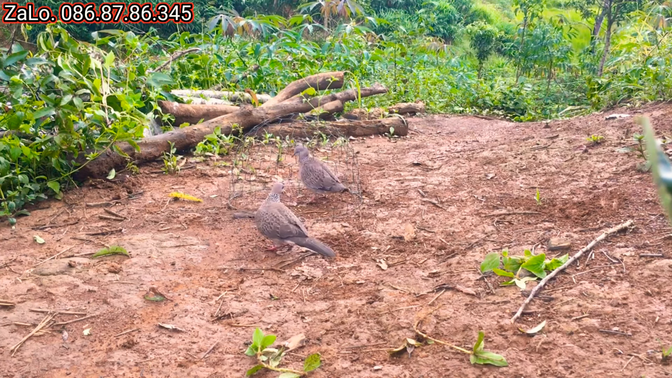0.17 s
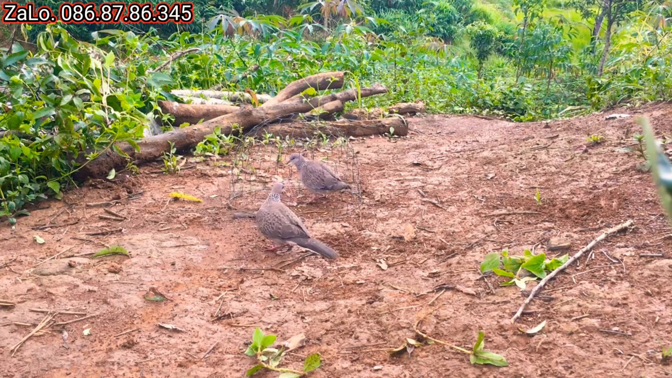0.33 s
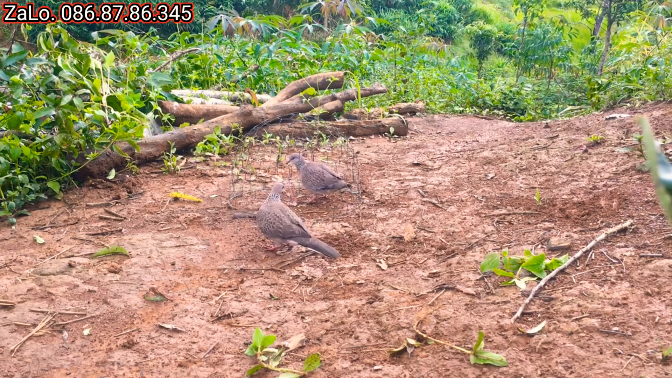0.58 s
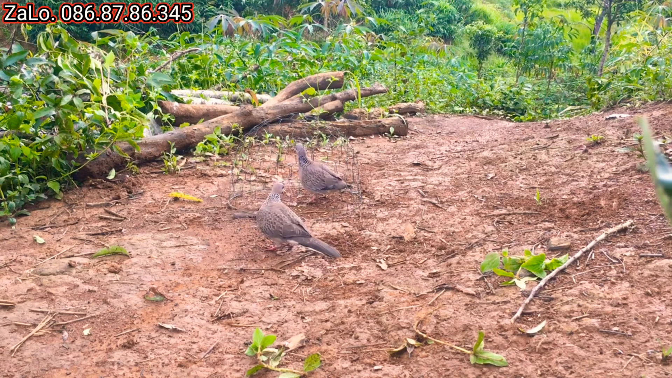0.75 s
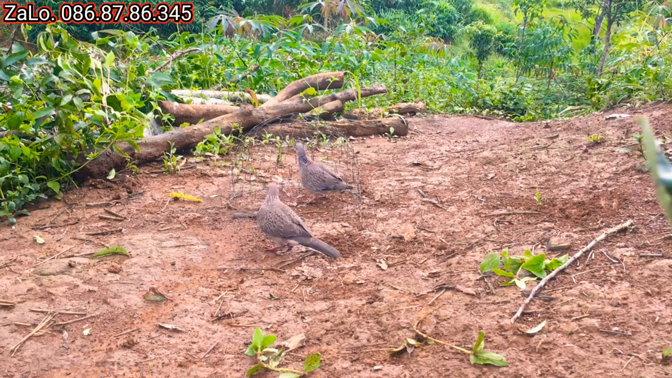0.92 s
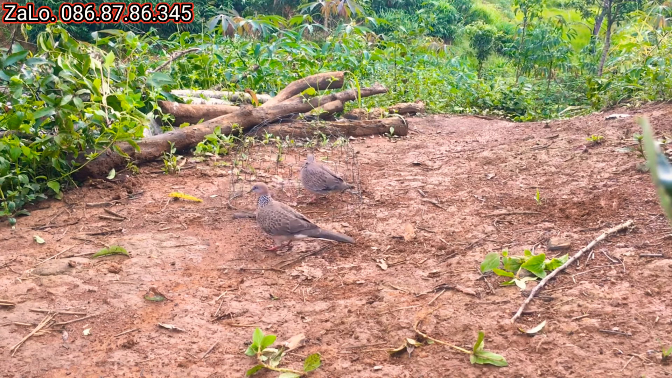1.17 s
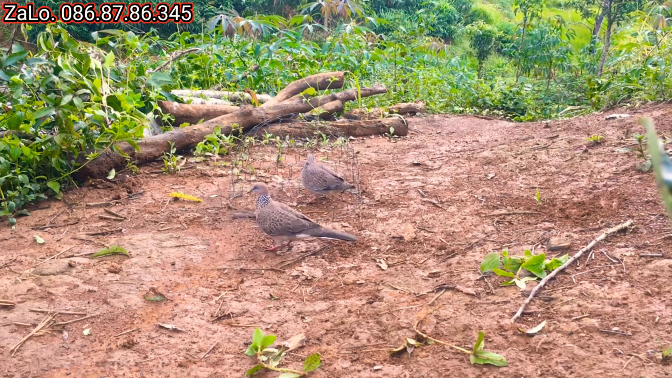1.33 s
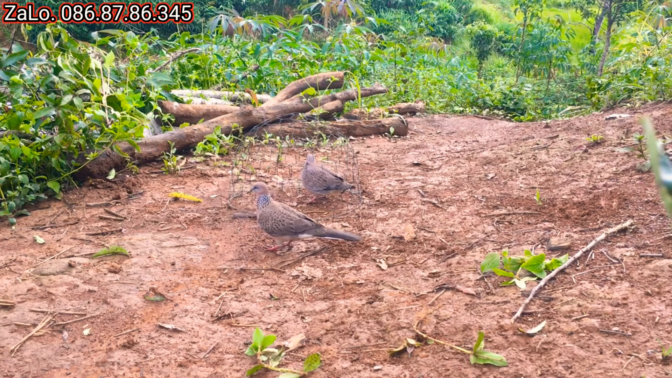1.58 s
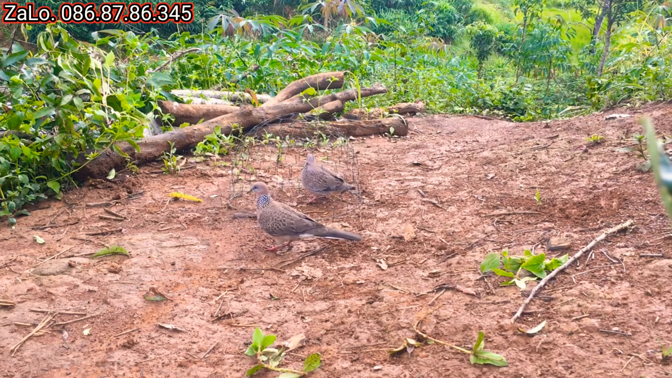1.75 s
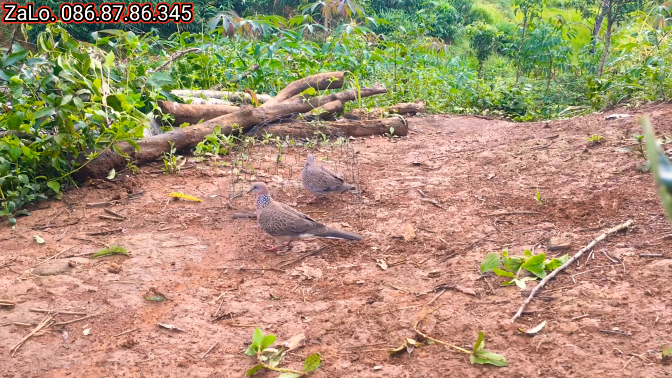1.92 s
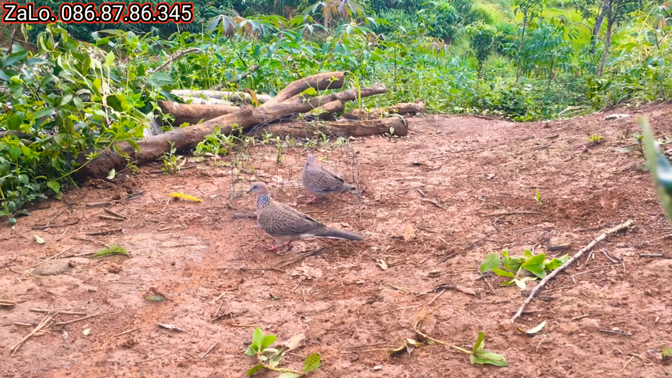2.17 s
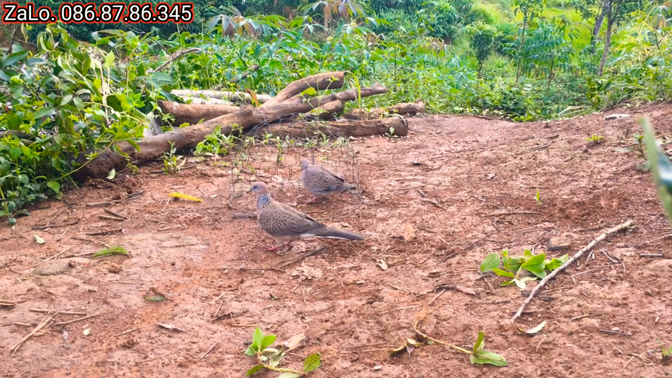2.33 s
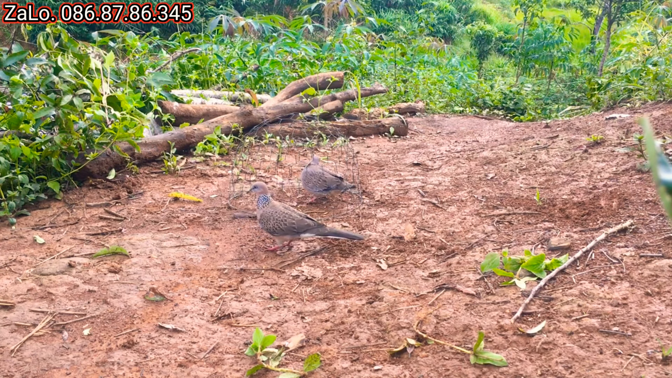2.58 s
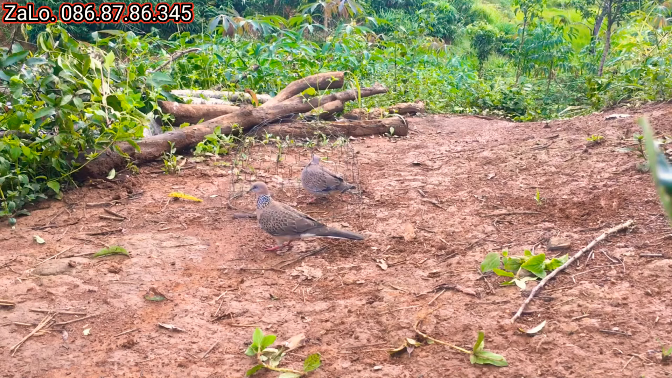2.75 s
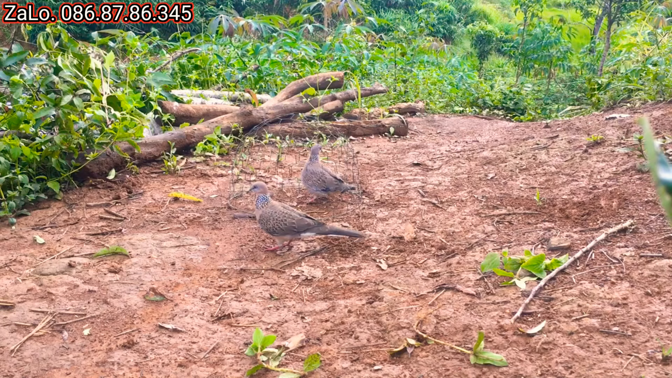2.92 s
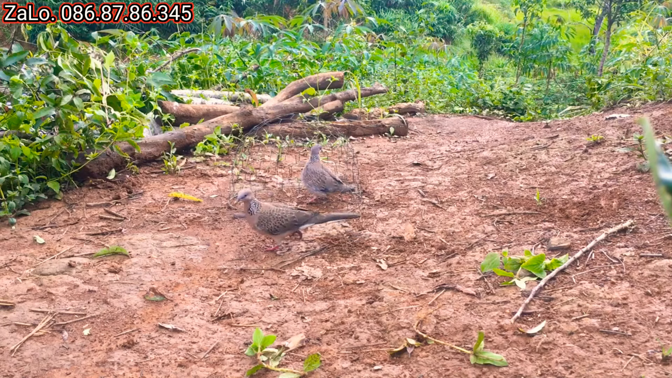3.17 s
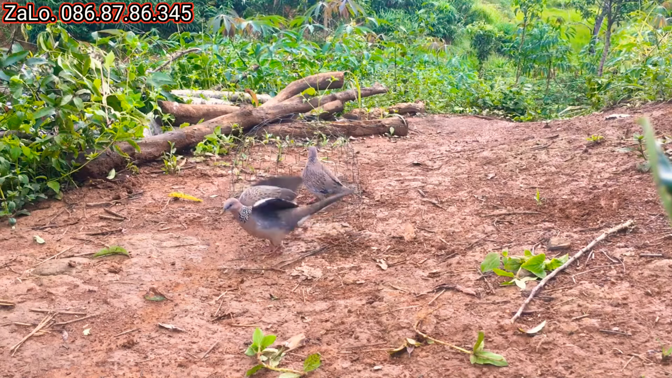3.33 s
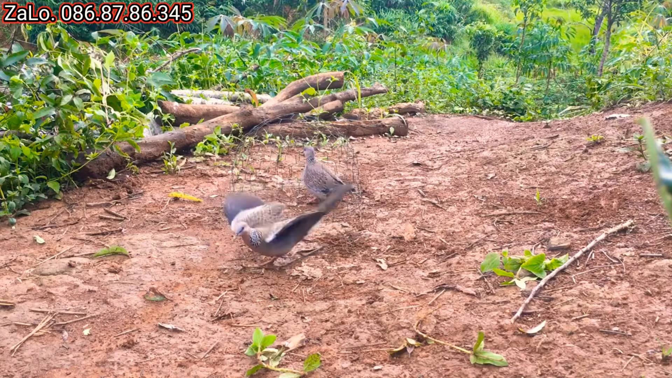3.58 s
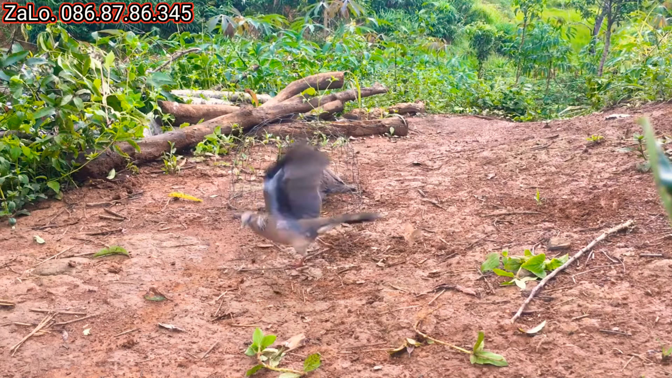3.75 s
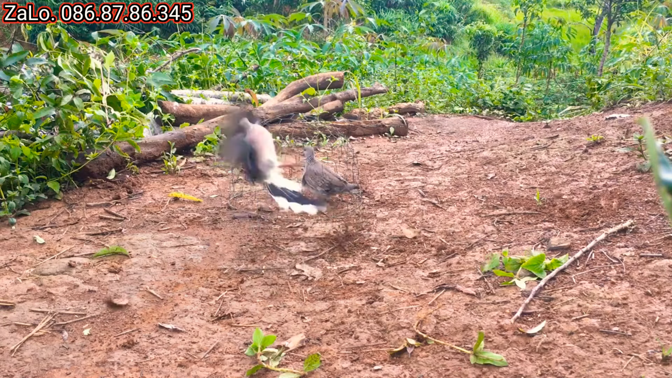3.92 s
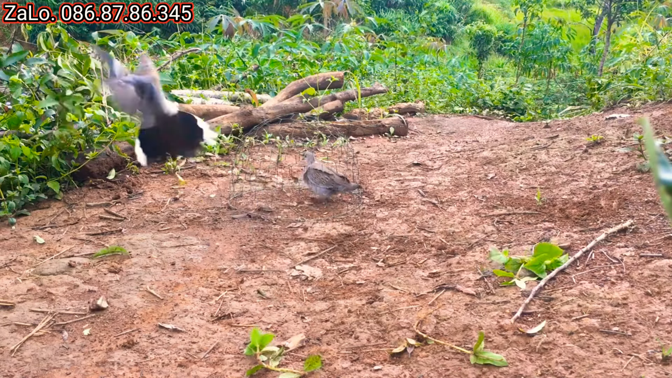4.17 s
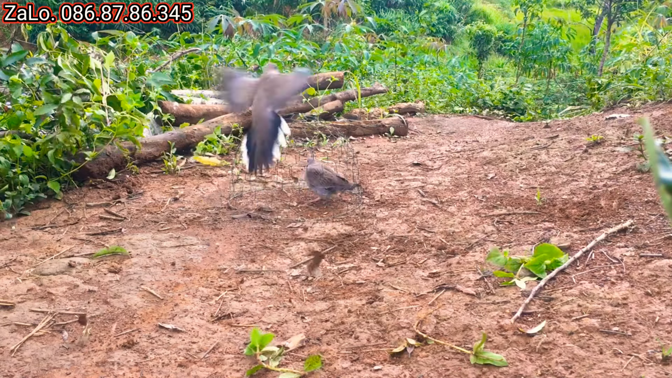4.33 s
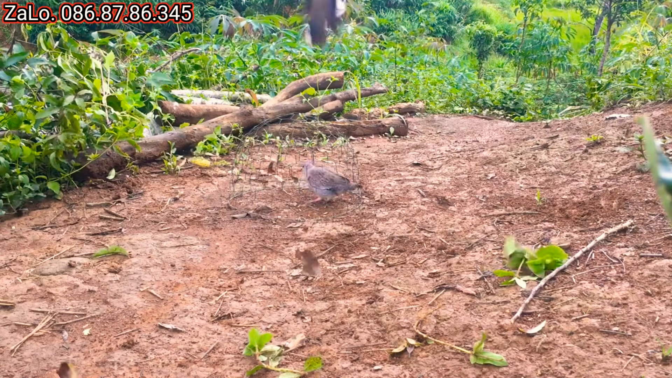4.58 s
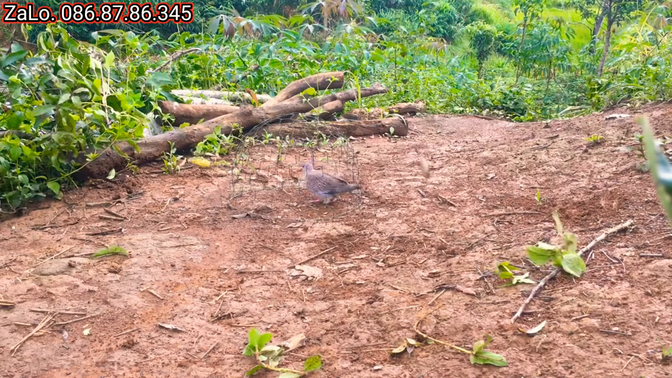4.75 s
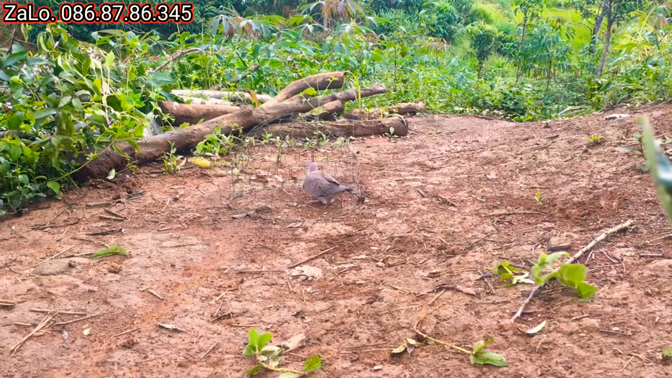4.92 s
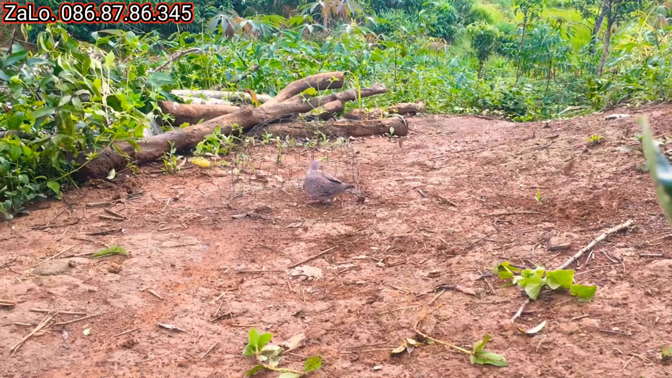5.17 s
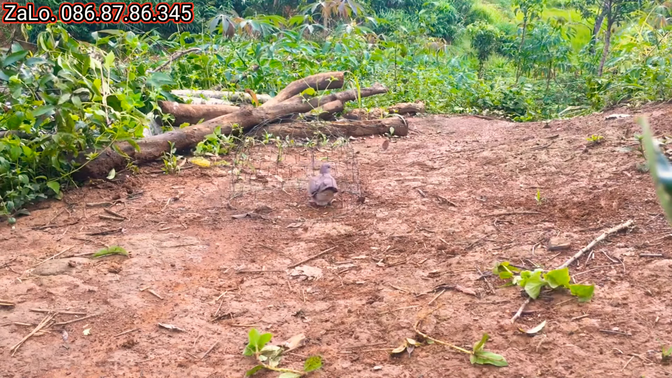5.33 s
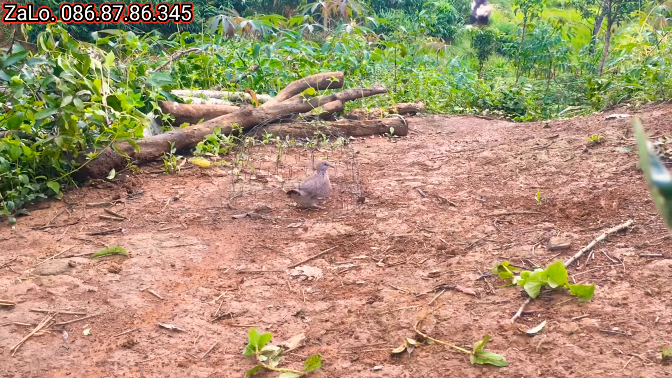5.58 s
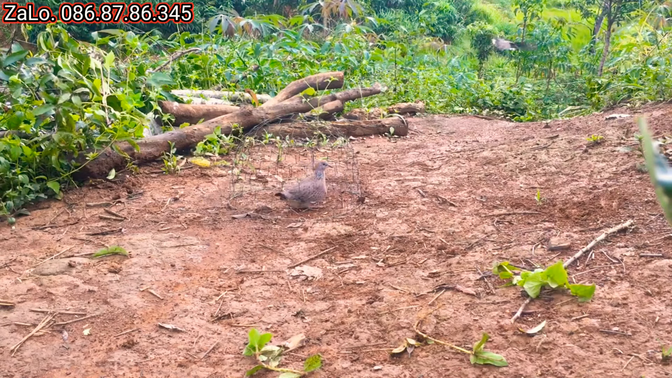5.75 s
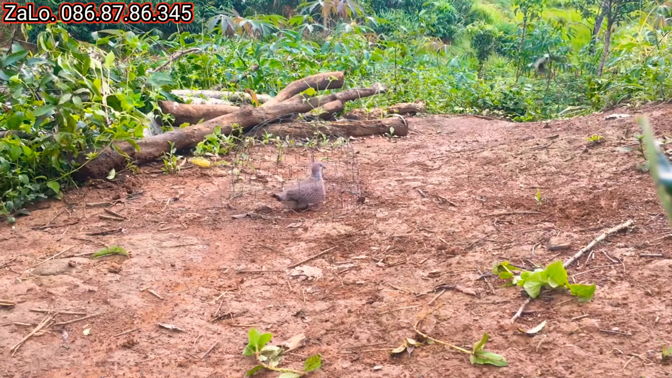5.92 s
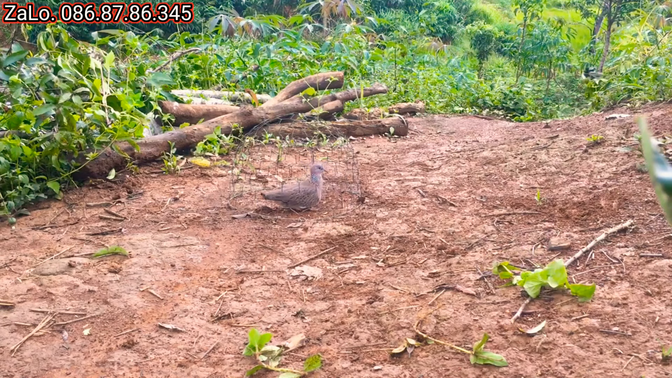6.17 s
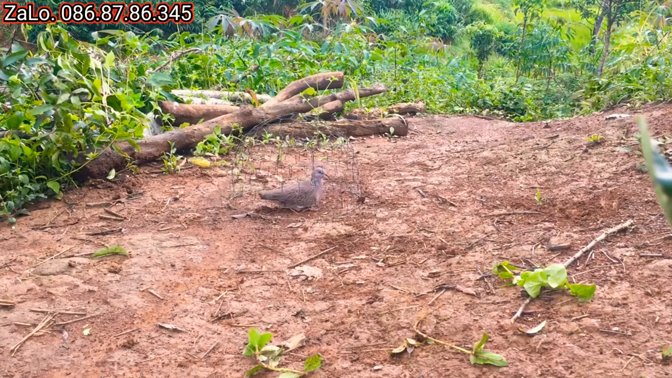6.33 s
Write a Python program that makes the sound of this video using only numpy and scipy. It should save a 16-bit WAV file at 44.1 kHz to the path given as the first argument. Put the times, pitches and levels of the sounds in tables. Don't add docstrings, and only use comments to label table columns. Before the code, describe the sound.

Small birds chirp softly over a forest hush until a nearby dove takes off in crisp, fluttering wing claps, whistling feathers and rushing air.

```python
import sys
import numpy as np
from scipy import signal
from scipy.fft import rfft, irfft
from scipy.io import wavfile
from scipy.ndimage import uniform_filter1d

SR = 44100
rng = np.random.default_rng(int(sys.argv[2]) if len(sys.argv) > 2 else 0)


def makeup_ratio(level_db):
    decades = np.asarray(level_db, float) / 20
    return 10 ** decades


def wav_out(sig):
    wavfile.write(sys.argv[1], SR, np.round(np.clip(np.atleast_2d(sig).T, -1, 1) * 32767).astype(np.int16))


N = 281843
TIME_S = np.arange(N) / SR


def noise():
    return rng.standard_normal(N)


def rms_one(x):
    return x / np.sqrt(np.mean(x ** 2) + 1e-20)


def level_in_time(rows):
    s, db = np.transpose(rows)
    return np.interp(TIME_S, s, db)


def coloured(x, spectrum):
    hz, db = np.transpose(spectrum)
    grid_hz = np.maximum(np.arange(N // 2 + 1) * SR / N, 1)
    gain = makeup_ratio(np.interp(np.log(grid_hz), np.log(hz), db))
    return rms_one(irfft(rfft(x) * gain, N))


def drift(rate_hz):
    r = np.exp(-2 * np.pi * rate_hz / SR)
    return rms_one(signal.lfilter([1], [1, -2 * r, r * r], rng.standard_normal(N + SR))[SR:])


def resonance(x, hz, width_hz):
    r = np.exp(-np.pi * width_hz / SR)
    poles = [1, -2 * r * np.cos(2 * np.pi * hz / SR), r * r]
    return signal.lfilter([(1 - r * r) / 2, 0, (r * r - 1) / 2], poles, x)


def narrow_noise(hz, width_hz):
    return rms_one(resonance(resonance(noise(), hz, width_hz), hz, width_hz))


def add(out, s, piece):
    i = max(round(s * SR), 0)
    out[i:i + len(piece)] += piece[:N - i]


def glide(first_hz, last_hz, length_s, overtone_db):
    u = np.linspace(0, 1, int(length_s * SR))
    phase = 2 * np.pi * np.cumsum(first_hz + (last_hz - first_hz) * u) / SR
    tone = np.sin(phase) + makeup_ratio(overtone_db) * np.sin(2 * phase)
    return np.sqrt(2 * np.sin(np.pi * u)) * tone


def slides(rows):
    out = np.zeros(N)
    for s, db, first_hz, last_hz, length_s in rows:
        add(out, s, makeup_ratio(db) * glide(first_hz, last_hz, length_s, -30))
    return out


def grains(per_s, spread_db):
    sizes = makeup_ratio(spread_db * np.minimum(rng.exponential(1, N), 4)) * rng.choice([-1, 1], N)
    return rms_one(sizes * (rng.random(N) < per_s / SR))


# start_s, bright_db, slap_hz, slap_db, thump_db
CLAPS = [(3.5344, -16.5, 1400, -31.5, -33.5), (3.852, -24.5, 2620, -35.5, -36.5),
         (3.9279, -20.5, 1900, -24.5, -43), (4.155, -22, 1420, -28, -40), (4.2158, -23, 1880, -30, -40),
         (4.3192, -9, 2390, -19, -15), (4.337, -18, 2280, -33, -33), (4.371, -28, 1400, -32.5, -47),
         (4.427, -12.5, 1510, -18.5, -30), (4.496, -18.5, 2900, -31, -39),
         (4.5388, -22.5, 1520, -26, -37.5), (4.656, -24, 1430, -30, -42), (4.767, -25, 1560, -31.5, -51),
         (4.824, -9.5, 3700, -58, -55), (4.8263, -17, 2930, -24, -38.5), (4.879, -19, 2800, -18.5, -33.5),
         (4.9225, -21.5, 1340, -27.5, -41), (5.0084, -20.5, 1250, -28, -43), (5.1221, -15, 2370, -20, -35),
         (5.198, -19, 2770, -33.5, -48), (5.3524, -14.5, 3200, -24.5, -37), (5.4018, -34, 3490, -54, -60),
         (5.5126, -23, 2180, -32.5, -44), (5.9189, -21.5, 1400, -35, -41)]
# start_s, bright_db, t60_s
BRUSHES = [(3.392, -38, 0.022), (3.6514, -38, 0.012), (3.7557, -35, 0.039), (3.777, -23.5, 0.13),
           (3.7896, -31, 0.068), (3.8902, -22.5, 0.03), (3.9611, -23, 0.0088), (4.001, -25.5, 0.025),
           (4.116, -50, .044), (4.145, -38, 0.032), (4.245, -23.5, .015), (4.283, -27.5, 0.1),
           (4.394, -25.5, 0.012), (4.577, -24, 0.019), (4.6956, -23, 0.011), (4.8089, -23, 0.013),
           (4.9638, -26.5, 0.014), (5.1666, -25, 0.02), (5.28, -28.5, 0.033), (5.317, -33, .027),
           (5.436, -26.5, 0.014), (5.5576, -26.5, 0.0082), (5.5951, -35, .013), (5.638, -31.5, 0.025),
           (5.755, -33.5, 0.021), (5.8017, -29.5, 0.02), (5.8366, -31, 0.03), (6.051, -37, 0.057),
           (6.081, -37, .015), (6.153, -35, 0.053)]


def contacts():
    hard = []
    for row in CLAPS:
        t60_s = 0.0087 * makeup_ratio(0.01 * (row[1] + 32))
        hard.append((*row, t60_s))
    slap_hz = rng.uniform(1400, 3200, len(BRUSHES))
    soft = [(s, db, hz, db - 13.5, db - 17, t60_s) for (s, db, t60_s), hz in zip(BRUSHES, slap_hz)]
    return hard + soft


# rise_ms, hold_ms
CLAP_SHAPES = [(1.3, 2.56), (1.5, 3.36), (0.65, 3.9), (0.086, 0.23), (2, 3.3), (0.17, 2.37), (.3, 1.4),
               (1, 4), (0.14, 0.89), (0.43, 3.6), (.2, 1.5), (0.18, 1.8), (.5, 2.1), (0.11, 0.94),
               (1.3, 2.4), (0.24, 2.3), (0.4, 3.6), (0.26, 1.1), (1.1, 4.2), (0.83, 3.8), (0.22, 3.1),
               (.5, 1.8), (0.33, 3.45), (0.083, 1.36)]
# rise_ms, hold_ms
BRUSH_SHAPE = (0.25, 2.07)
# freq_hz, level_db
CLAP_COLOUR = [(2000, -22), (3500, -6), (5000, -6), (6500, -2), (8500, 0), (12000, -4), (15000, -9),
               (16800, -14)]


def claps():
    out, t = np.zeros(N), np.arange(SR // 12) / SR
    hits = contacts()
    draws = rng.random((len(hits), 2, len(t)))
    hz, db = np.transpose(CLAP_COLOUR)
    grid_hz = np.log(np.arange(len(t) // 2 + 1) * SR / len(t) + 1)
    log_hz = np.log(hz)
    settling = makeup_ratio(-10.5 - 60 * t / 0.06)
    head = slice(0, SR // 200)
    shapes_s = np.clip(CLAP_SHAPES + [BRUSH_SHAPE] * len(BRUSHES), .05, 6) / 1000
    for hit, (size, when), (rise_s, hold_s) in zip(hits, draws, shapes_s):
        s, bright_db, slap_hz, slap_db, thump_db, t60_s = hit
        late = t - hold_s
        shape = makeup_ratio(-60 * np.maximum(late, 0) / np.clip(t60_s, .006, .2)) + settling
        shape = shape * np.minimum(t / rise_s, 1)
        rebound = .5 * np.exp(-((late - .003) / 0.00088) ** 2)
        thump = rebound - np.exp(-((late - .0011) / 0.00035) ** 2)
        ticks = (when < .16) * np.sign(size - .5) * makeup_ratio(12 * abs(2 * size - 1))
        colour = makeup_ratio(np.interp(grid_hz, log_hz, db + 7 * size[-len(hz):]))
        burst = shape * irfft(rfft(ticks) * colour, len(t))
        slap = resonance(ticks * shape, slap_hz, 0.29 * slap_hz)
        add(out, s, burst / np.std(burst[head]) * makeup_ratio(bright_db - 15.5))
        add(out, s, slap / np.std(slap[head]) * makeup_ratio(slap_db - 9.0))
        add(out, s, thump * makeup_ratio(thump_db + 7.5))
    return out


# start_s, level_db, pitch_hz, t60_s
POCKETS = [(3.5355, -43, 706, 0.024), (3.5357, -25, 11330, .006), (4.3209, -2.5, 2300, .008),
           (4.32, -34, 604, 0.014), (4.3385, -20, 2370, .01), (4.338, -25, 4600, .008),
           (4.4267, -26.5, 3190, 0.023), (4.4275, -19.5, 7070, 0.0088), (4.498, -26, 1250, 0.014),
           (4.8275, -28, 3480, 0.014), (4.8804, -19.5, 1100, 0.011), (4.8793, -25, 6530, 0.012),
           (5.009, -28, 3650, .01), (5.125, -25, 1310, 0.028), (5.1238, -19, 3570, 0.013),
           (5.1245, -21, 8310, 0.012), (5.3522, -21.5, 5900, 0.015), (5.3528, -16, 9400, 0.01),
           (5.919, -18, 8350, 0.007), (5.92, -23, 6600, 0.0073), (4.6986, -35, 3280, 0.019),
           (5.1995, -35, 3500, .012)]


def pockets():
    out, t = np.zeros(N), np.arange(SR // 30) / SR
    for s, db, hz, t60_s in POCKETS:
        ring = np.sin(2 * np.pi * hz * t) * np.minimum(t / .0005, 1)
        add(out, s, makeup_ratio(db - 60 * t / t60_s) * ring)
    return out


# start_s, level_db
SNAPS = [(3.386, -46), (3.661, -36), (3.9615, -27), (3.9665, -36), (3.991, -25), (4.0005, -27),
         (4.0214, -34), (4.0768, -46), (4.1462, -27), (4.155, -31), (4.213, -25), (4.3183, -1.5),
         (4.3208, -2), (4.912, -34), (5.045, -38), (4.359, -29), (4.3745, -29), (4.395, -35), (5.506, -29),
         (5.5417, -31), (5.885, -36), (6.049, -34), (6.2541, -48)]


def snaps():
    out, t = np.zeros(N), np.arange(SR // 100) / SR
    for (s, db), hiss in zip(SNAPS, rng.standard_normal((len(SNAPS), len(t)))):
        add(out, s, makeup_ratio(db - 6 - 60 * t / 0.0042) * signal.lfilter([1, -1], [1, -.6], hiss))
    return out


# down_s, down_db, up_lead_s, up_db
BEATS = [(3.784, -33.5, 0.038, -60), (3.93, -28, 0.038, -33.5), (4.011, -44, 0.035, -26.5),
         (4.082, -28.5, 0.039, -27.5), (4.147, -24.5, .025, -26), (4.223, -39, .025, -31),
         (4.289, -31, .036, -37), (4.364, -27.5, 0.046, -36), (4.433, -43, 0.038, -31),
         (4.504, -28.5, .032, -29.5), (4.578, -26.5, .029, -33), (4.663, -31, .034, -40),
         (4.74, -29.5, .035, -50), (4.808, -27, .034, -32), (4.887, -29, 0.036, -36),
         (4.97, -34, .037, -30), (5.056, -36, 0.041, -38), (5.129, -32, .039, -34),
         (5.207, -30, 0.033, -30), (5.285, -31.5, 0.037, -35), (5.359, -30.5, .034, -30.5),
         (5.441, -36, 0.036, -42), (5.519, -37, 0.037, -31), (5.602, -37.5, 0.04, -43),
         (5.689, -44, 0.044, -43), (5.765, -38, 0.028, -58), (5.844, -36, .029, -43),
         (5.924, -43, 0.036, -47), (6.009, -47, 0.04, -49), (6.167, -56, .075, -55)]


def strokes():
    rows = []
    for s, db, lead_s, up_db in BEATS:
        rows += [(s - lead_s, up_db), (s, db)]
    return rows


def pushes():
    out, t = np.zeros(N), np.arange(-SR // 25, SR // 25) / SR
    for (s, db), (stretch, lean) in zip(strokes(), rng.normal(0, 1, (2 * len(BEATS), 2))):
        u = t / (.0028 * makeup_ratio(1.5 * np.clip(stretch, -2, 2)))
        u = np.where(u > 0, 1.08 * np.log1p(np.abs(u) / 2.9), u)
        add(out, s - .042, makeup_ratio(db + 2.0) * np.exp(-u * u) * np.sin(3.02 * u + 0.79 * lean))
    return out


# start_s, level_db, pitch_hz, length_s
WHISTLES = [(3.913, -32, 896, 0.0059), (4.004, -33, 700, 0.0082), (4.056, -22.5, 1080, 0.014),
            (4.099, -38, 1216, 0.014), (4.11, -48, 1290, 0.0059), (4.162, -27.5, 1250, 0.008),
            (4.233, -34.5, 1180, 0.0062), (4.275, -33.5, 1140, 0.0048), (4.436, -45, 1350, 0.0061),
            (4.41, -43, 1060, 0.009), (4.451, -34.5, 1090, 0.018), (4.585, -48, 990, .02),
            (4.674, -40, 1117, 0.019), (4.469, -43, 1520, .012), (4.488, -34, 1060, 0.014),
            (4.52, -56, 1110, 0.0096), (4.733, -43, 1005, .01), (4.843, -53, 1150, .01),
            (5.295, -51, 1230, .012), (4.559, -32, 1030, 0.01), (4.638, -32.5, 984, 0.0079),
            (4.723, -47, 1020, 0.01), (4.79, -31, 1044, 0.0064), (4.812, -33, 1050, 0.0061),
            (4.827, -32, 1004, 0.012), (4.901, -45, 970, .012), (4.864, -26.5, 1080, 0.0061),
            (4.945, -29.5, 1030, 0.0117), (4.966, -35, 1010, 0.0092), (5.051, -37, 1260, 0.0064),
            (5.064, -30.5, 1120, 0.0076), (5.229, -42, 1130, .01), (5.104, -39.5, 916, 0.011),
            (5.158, -36, 1150, 0.0082), (5.188, -32.5, 1028, 0.016), (5.264, -35.5, 990, 0.011),
            (5.34, -38, 910, 0.0089), (5.367, -35, 1290, 0.0072), (5.385, -48, 1060, 0.015),
            (5.736, -37, 1080, 0.0093)]


def whistles():
    out = np.zeros(N)
    for (s, db, hz, length_s), bend in zip(WHISTLES, rng.normal(.04, .03, len(WHISTLES))):
        if length_s > .0175:
            bend = -.07
        first_hz, last_hz, sounding_s = hz * (1 + bend), hz * (1 - bend), max(1.2 * length_s, .009)
        tone = glide(first_hz, last_hz, sounding_s, -13)
        tone = tone + makeup_ratio(-22) * glide(3 * first_hz, 3 * last_hz, sounding_s, -60)
        fade = makeup_ratio(db - 5.5 - np.linspace(0, 3.0, len(tone)))
        add(out, s - .004, fade * signal.windows.tukey(len(tone), .6) * tone)
    return out * (1 + .3 * drift(150))


# start_s, level_db
WAKE = [(3.38, -55), (3.72, -57.5), (3.78, -55), (3.83, -74), (3.86, -42), (3.92, -46.5), (4.22, -41.5),
        (4.3, -46.5), (4.8, -48.5), (4.9, -50.5), (5.38, -50), (5.6, -55), (6.03, -58.5), (6.39, -61)]
# centre_s, half_length_s, rush_db, rustle_db
GUSTS = [(3.753, 0.015, -51, -60), (3.784, 0.014, -39.5, -67), (3.99, 0.036, -41, -52),
         (6.062, 0.011, -48, -55.5), (6.165, 0.019, -51.5, -63), (6.218, 0.051, -55, -67),
         (6.267, 0.05, -65, -64.5)]


def stirring():
    wake_db = level_in_time(WAKE)
    rush, rustle = makeup_ratio(wake_db), makeup_ratio(wake_db - 11)
    for s, half_s, rush_db, rustle_db in GUSTS:
        swell = np.exp(-((TIME_S - s) / half_s) ** 2)
        rush = rush + makeup_ratio(rush_db) * swell
        rustle = rustle + makeup_ratio(rustle_db) * swell
    return 20 * np.log10(rush), 20 * np.log10(rustle)


# freq_hz, density_db
RUSH = [(59, -76), (100, 4), (480, -11.5), (615, -11), (749, -12.5), (1130, -12), (1510, -15),
        (2210, -16.5), (5000, -32), (6500, -17), (11000, -120)]
# freq_hz, density_db
RUSTLE = [(1500, -21), (3000, 2.5), (6000, -5), (9000, 3.5), (12000, -7), (15000, -3), (16500, -43)]


def wake():
    rush_db, rustle_db = stirring()
    puffs, t = np.zeros(N), np.arange(SR // 12) / SR
    for s, db in strokes():
        add(puffs, s - .008, makeup_ratio(db - 13.0) * t / 0.0037 * np.exp(-t / 0.0051))
    on = np.clip((TIME_S - 3.38) / 0.0073, 0, 1)
    rush = coloured(noise(), RUSH) * (makeup_ratio(rush_db + 4.0 * drift(49) - 6.0) + puffs)
    rustle = coloured(grains(5000, 3.4), RUSTLE) * makeup_ratio(rustle_db + 3.3 * drift(23) + 3.0)
    hum = rms_one(resonance(noise(), 1206, 260)) * makeup_ratio(rush_db - 11.5 + 8.6 * drift(19))
    hum = hum * (abs(TIME_S - 4.65) < .8)
    catches = uniform_filter1d(abs(grains(44, 3.3)), size=90) * noise()
    catches = coloured(catches, CLAP_COLOUR) * makeup_ratio(rustle_db - 13.0)
    return on * (rush + rustle + hum + catches)


def ruffles():
    hits, dealt = grains(420, 6.3), rng.integers(0, 8, N)
    rings = np.zeros(N)
    for k, hz in enumerate(np.geomspace(700, 3800, 8)):
        rings += resonance(hits * (dealt == k) + 1e-18, hz, 0.24 * hz)
    return rms_one(rings) * makeup_ratio(stirring()[0] - 13) * (TIME_S > 3.77)


# start_s, level_db, pitch_hz
FLICKS = [(3.86, -41, 2150), (3.944, -32, 1030), (3.967, -38, 1900), (3.984, -39, 1870), (3.991, -35, 1300),
          (4.007, -32.5, 900), (4.022, -31, 2100), (4.041, -46, 1090), (4.076, -37, 2000),
          (4.121, -39, 3200), (4.204, -34, 1000), (4.225, -31, 1600), (4.259, -44, 1110),
          (4.359, -30, 1300), (4.518, -45, 1800), (4.57, -33, 1190), (4.589, -43, 2200), (4.65, -34, 1700),
          (4.666, -34, 1100), (4.716, -39, 2600), (4.729, -43, 3000), (4.9, -35, 1100), (4.975, -38, 1200),
          (5.051, -36, 2200), (5.072, -42, 1600), (5.088, -44, 980), (5.139, -41, 1080), (5.262, -42, 1105),
          (5.374, -38, 1090), (6.151, -36.5, 1730), (6.164, -36, 1400), (6.205, -40, 2000),
          (6.255, -42.5, 1620)]


def flicks():
    out, t = np.zeros(N), np.arange(SR // 40) / SR
    for (s, db, hz), hiss in zip(FLICKS, rng.standard_normal((len(FLICKS), len(t)))):
        rub = resonance(hiss * abs(hiss) * t * np.exp(-t / .0025), hz, .5 * hz)
        add(out, s, makeup_ratio(db - 11) * rub / np.std(rub[:SR // 120]))
    return out


# start_s, level_db
KNOCKS = [(5.454, -32), (5.457, -25), (5.462, -31), (5.4786, -21.5), (5.48, -31), (5.49, -30), (5.499, -35),
          (5.509, -44)]
# pitch_hz, level_db, t60_s
TWIG = [(451, -8, 0.022), (824, 6, 0.015), (1270, -4, 0.012), (670, -10, 0.015), (310, -20, 0.019)]


def knocks():
    out, t = np.zeros(N), np.arange(SR // 10) / SR
    for (s, db), mix_db in zip(KNOCKS, rng.normal(0, 2.1, (len(KNOCKS), len(TWIG)))):
        for (hz, level_db, t60_s), own_db in zip(TWIG, mix_db):
            mode = np.sin(2 * np.pi * hz * t) * np.minimum(t / 0.00071, 1)
            add(out, s, makeup_ratio(db - 8.0 + level_db + own_db - 60 * t / t60_s) * mode)
    return out


# start_s, level_db, first_hz, last_hz, length_s
TWANGS = [(5.4605, -43, 1300, 1200, .006), (5.463, -40, 850, 560, 0.011), (5.4785, -26.5, 876, 814, 0.0074),
          (5.479, -35, 445, 423, 0.011), (5.487, -38, 700, 450, 0.0053), (5.49, -41, 1080, 855, 0.0063),
          (5.497, -39, 380, 450, 0.0092), (5.506, -41, 410, 374, 0.0073), (5.514, -50, 340, 180, 0.016)]


def twangs():
    return slides(TWANGS)


# first_s, last_s, gap_s, level_db
TRILL = [(.056, .06, .04, -62), (.53, .84, .0615, -68), (.919, 1.235, .0392, -60), (1.35, 1.48, .042, -62),
         (1.535, 1.59, .05, -61), (1.69, 1.75, .055, -64), (1.79, 1.91, .038, -62),
         (1.966, 2.08, .0555, -61), (2.197, 2.515, .039, -62), (2.667, 3.0, .0547, -61),
         (3.162, 3.17, .04, -61), (3.217, 3.45, .0385, -61), (3.568, 3.74, .04, -58),
         (3.83, 3.84, .04, -58)]


def trill():
    out = np.zeros(N)
    for first_s, last_s, gap_s, db in TRILL:
        starts_s = np.arange(first_s, last_s, gap_s)
        for s, (change, own_db) in zip(starts_s, rng.standard_normal((12, 2))):
            pitch = 1 + 0.005 * change
            note = glide(3300 * pitch, 3000 * pitch, .022, -40)
            add(out, s - .012, makeup_ratio(db - 1.3 + 1.4 * own_db) * note)
    return out


# first_hz, last_hz, length_s
ACCENT = (3720, 2640, .044)
PIP = (2710, 2630, .024)
PEEP = (5760, 5500, .017)
TICK = (4300, 3300, .019)
# start_s, level_db
ACCENTS = [(.404, -59), (0.863, -55), (1.244, -55), (1.627, -57.5), (2.112, -53.5), (2.562, -49.5),
           (3.043, -50.5), (3.466, -50), (3.881, -49), (4.276, -50), (5.39, -54.5)]
PIPS = [(0.183, -57), (.627, -63), (1.0, -64), (1.61, -64), (1.97, -61), (2.312, -63), (2.68, -62),
        (3.18, -63), (3.586, -56)]
PEEPS = [(.882, -66), (1.068, -69), (1.193, -66), (1.31, -65), (1.41, -69), (1.5, -65), (1.6, -64),
         (1.69, -71), (3.578, -63), (3.712, -62), (3.82, -59), (6.028, -65), (6.33, -61)]
TICKS = [(.097, -61), (1.522, -63), (1.878, -60), (2.225, -65), (2.595, -64), (3.503, -58)]
# start_s, level_db, first_hz, last_hz, length_s
STRAYS = [(.9, -68, 5220, 5130, .11), (1.09, -66, 5320, 5270, .04), (5.011, -48, 7680, 7620, .014),
          (5.022, -54, 7650, 7600, .026), (4.21, -44, 7000, 6500, .01), (3.104, -54, 3570, 3100, .021)]


def single_notes():
    out = np.zeros(N)
    for slide, times in ((ACCENT, ACCENTS), (PIP, PIPS), (PEEP, PEEPS), (TICK, TICKS)):
        for s, db in times:
            add(out, s, makeup_ratio(db) * glide(*slide, -62))
    for s, db in ACCENTS:
        add(out, s - .011, makeup_ratio(db - 9) * glide(3200, 3720, .011, -62))
        add(out, s + .056, makeup_ratio(db - 14) * glide(*ACCENT, -62))
    for s, db, first_hz, last_hz, length_s in STRAYS:
        add(out, s, makeup_ratio(db) * glide(first_hz, last_hz, length_s, -62))
    return out


# since_start_s, pitch_hz, level_db
SWOOP = [(0, 7450, -22), (.006, 6290, -0.5), (.013, 5500, 1.5), (.028, 4680, -1), (0.047, 4250, -3.5),
         (.055, 3990, -1.5), (0.065, 3000, -8)]
# start_s, level_db
SWOOPS = [(0.467, -44), (1.271, -43), (2.261, -46), (3.057, -44), (4.263, -46)]


def falling_chirps():
    out = np.zeros(N)
    s, hz, db = np.transpose(SWOOP)
    t = np.arange(0, s[-1], 1 / SR)
    phase = 2 * np.pi * np.cumsum(np.interp(t, s, hz)) / SR
    call = np.sin(phase) * makeup_ratio(np.interp(t, s, db)) * signal.windows.tukey(len(t), .1)
    for start_s, level_db in SWOOPS:
        add(out, start_s, makeup_ratio(level_db - 4) * call)
    return out


def songbirds():
    return (trill() + single_notes() + falling_chirps()) * (1 + .22 * drift(110))


def far_trill():
    presence = np.interp(TIME_S, [.8, .95, 4.8, 5.2], [.3, 1, 1, .2])
    return narrow_noise(3170, 300) * makeup_ratio(-72 + 4.0 * drift(18)) * presence


def leaves(x, t60_s):
    t = np.arange(SR // 2) / SR
    tail = rng.standard_normal(len(t)) * makeup_ratio(-60 * t / t60_s) * np.minimum(t / 0.0033, 1)
    tail = signal.lfilter([1], [1, -.3], tail)
    return signal.fftconvolve(x, tail / np.sqrt(np.sum(tail ** 2)))[:N]


# pitch_hz, width_hz, level_db
INSECTS = [(4430, 420, -64), (4760, 380, -64)]


def insects():
    return sum(makeup_ratio(db + drift(60)) * narrow_noise(hz, width_hz) for hz, width_hz, db in INSECTS)


# start_s, level_db
WIND = [(0.0, -40), (0.17, -50), (0.45, -53), (3.72, -77), (3.79, -55), (3.83, -59), (3.93, -28),
        (4.15, -25), (4.29, -33), (4.32, -29), (4.43, -54), (4.47, -28), (5.3, -44), (6.09, -52),
        (6.39, -47)]
# start_s, level_db, first_hz, last_hz, length_s
PUFFS = [(.022, -41.5, 61.5, 55, 0.028), (0.096, -43, 72, 45.7, 0.04), (.31, -47.5, 66, 44, 0.035),
         (1.19, -54, 62, 52, 0.049), (6.25, -52, 75, 45, 0.034)]


def wind():
    band = signal.butter(2, [38, 95], "band", fs=SR, output="sos")
    lumps = rms_one(signal.sosfilt(band, noise()))
    return makeup_ratio(level_in_time(WIND) - 11.5 + 0.56 * drift(12.0)) * lumps + slides(PUFFS)


# freq_hz, density_db
FOREST = [(24, -39), (40, -4), (151, 0.5), (340, -3), (500, -9.5), (630, -5), (760, -10.5), (1180, -7),
          (1410, -11), (1950, -10.5), (2840, -16.5), (3140, -15), (3740, -18), (4080, -21.5), (4570, -46),
          (5180, -16), (10700, -27.5), (14800, -32.5), (16000, -21)]


def forest_hush():
    return makeup_ratio(-54.5 + 0.82 * drift(4.6)) * coloured(noise(), FOREST)


def scene():
    strikes = claps() + knocks() + pockets() + snaps()
    tones, rubs, birds = whistles(), flicks(), songbirds()
    dove = strikes + tones + rubs + pushes() + wake() + ruffles() + twangs()
    scatter = makeup_ratio(-20) * leaves(strikes, .15) + makeup_ratio(-6) * leaves(birds, .2)
    scatter = scatter + makeup_ratio(-16.5) * leaves(tones + rubs, 0.065)
    background = far_trill() + insects() + wind() + forest_hush()
    return (dove + birds + scatter + background)[None]


def band_limit(x):
    return signal.sosfilt(signal.butter(12, 16830, fs=SR, output="sos"), x)


def record(dry):
    x = signal.sosfilt(signal.butter(3, 40, "high", fs=SR, output="sos"), dry)
    x = signal.sosfilt(signal.cheby2(10, 24, 15750, fs=SR, output="sos"), x)
    x = signal.sosfilt(signal.cheby2(12, 50, 17150, fs=SR, output="sos"), x)
    return band_limit(x)


dry = scene()
out = record(dry)
wav_out(out)
```